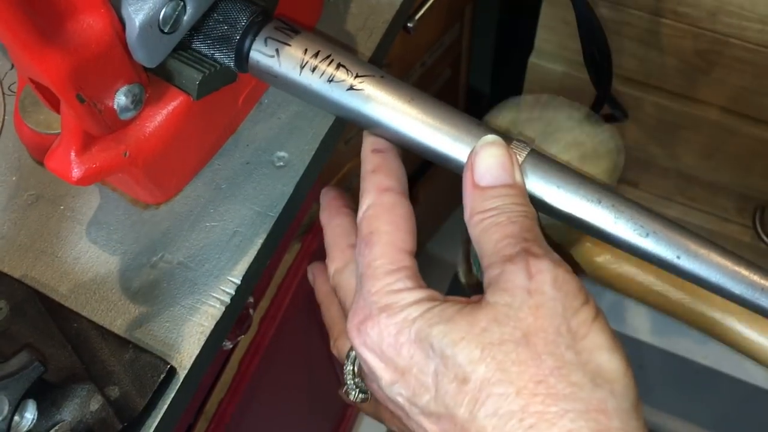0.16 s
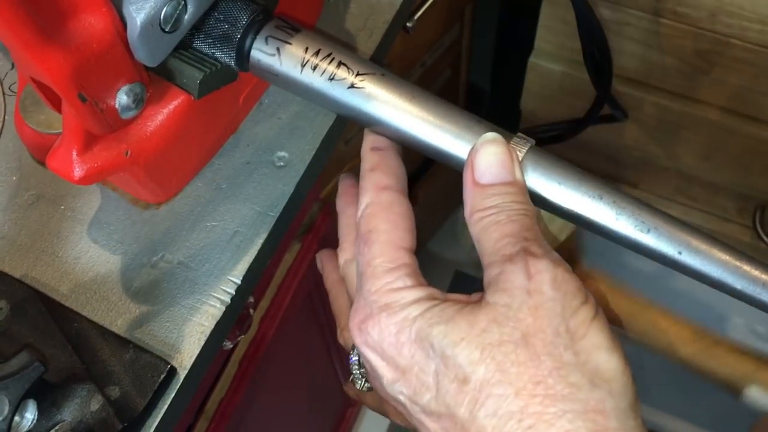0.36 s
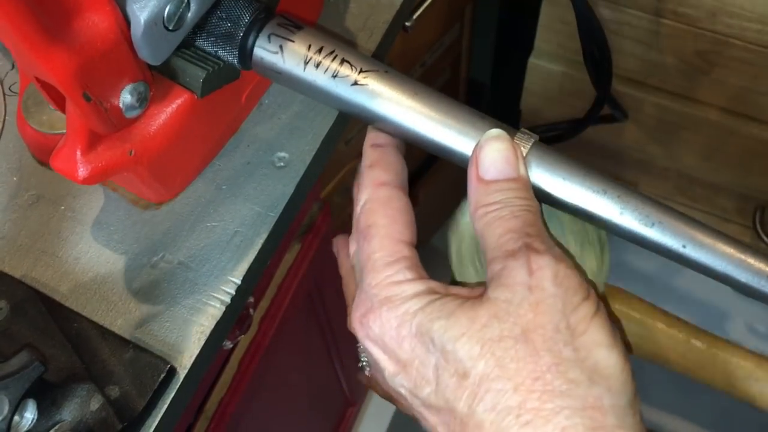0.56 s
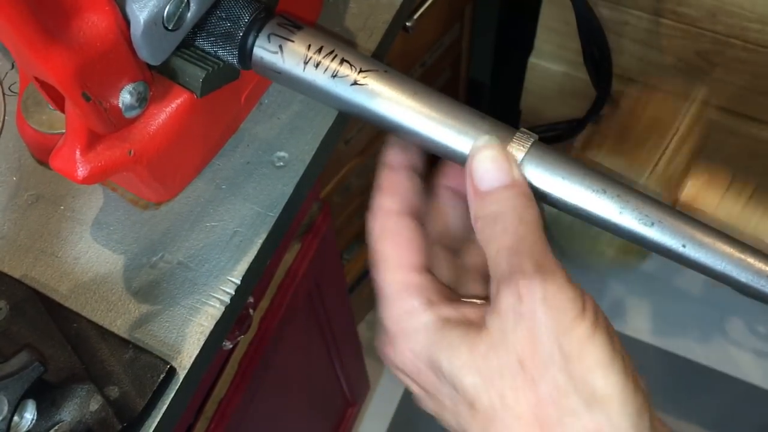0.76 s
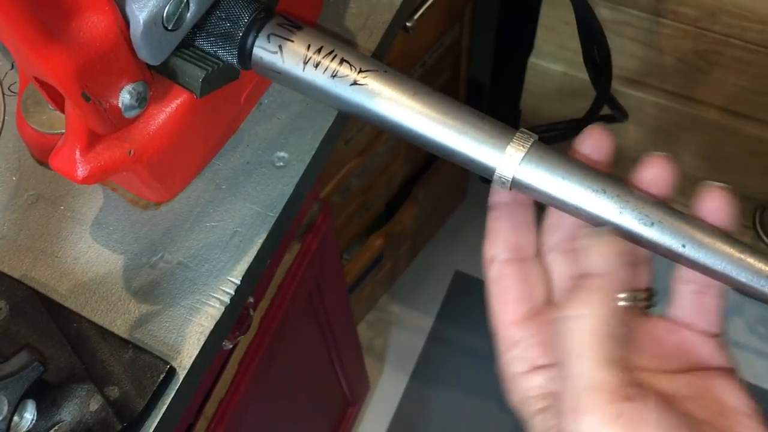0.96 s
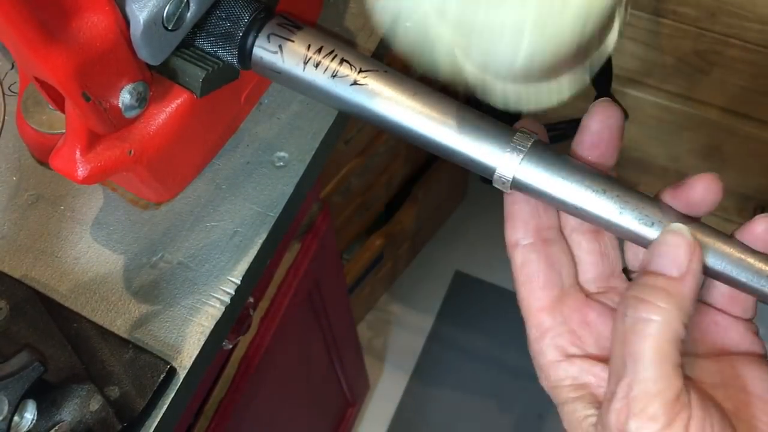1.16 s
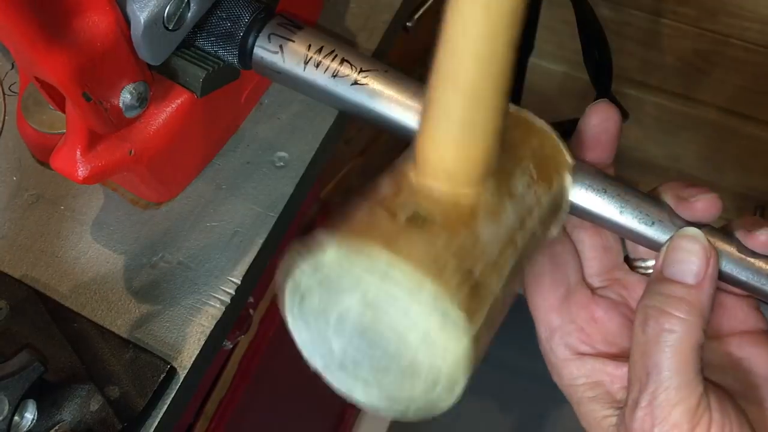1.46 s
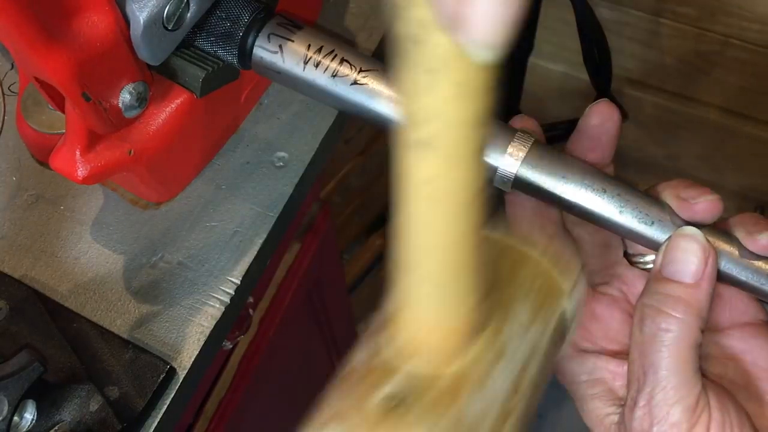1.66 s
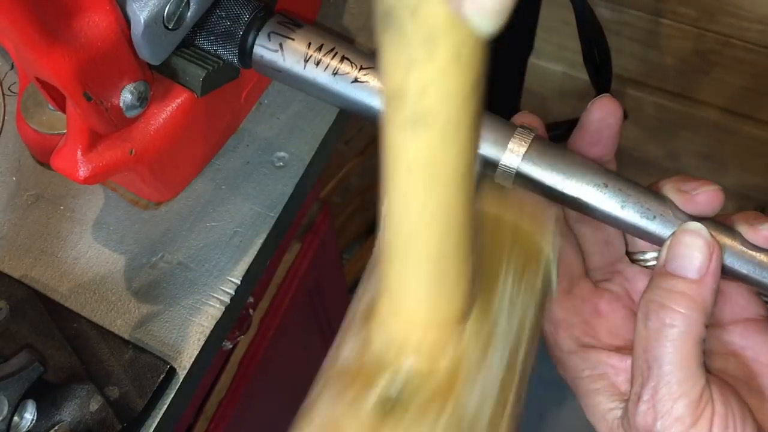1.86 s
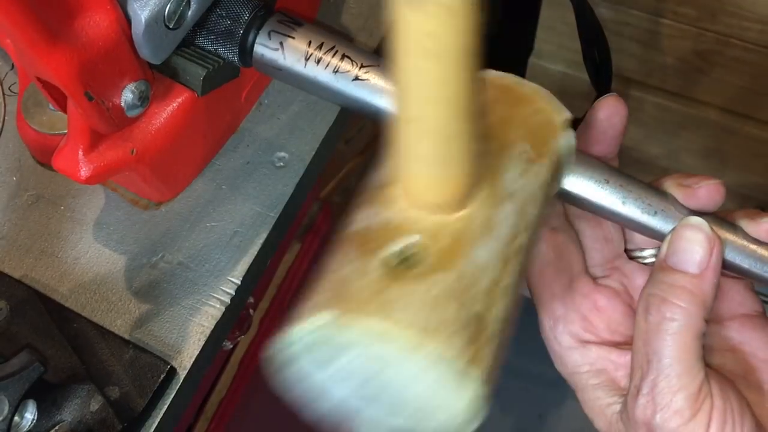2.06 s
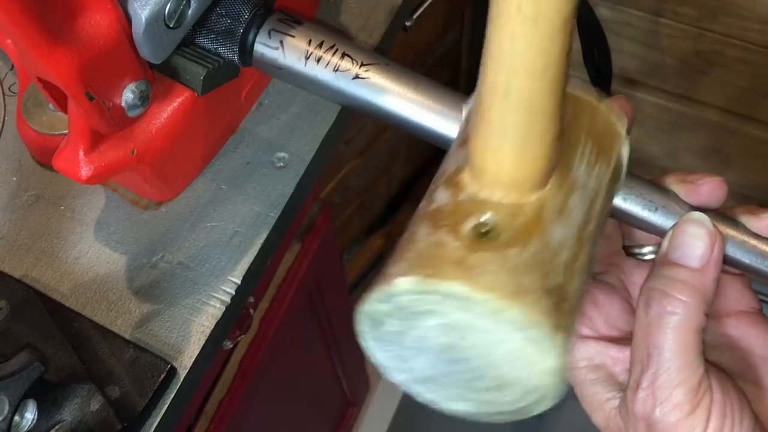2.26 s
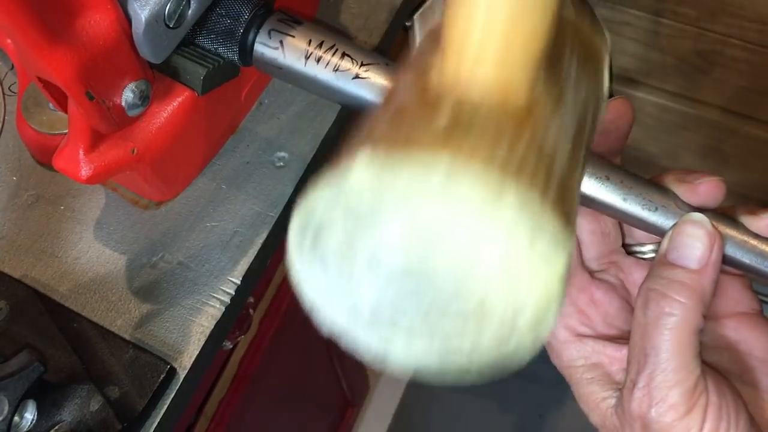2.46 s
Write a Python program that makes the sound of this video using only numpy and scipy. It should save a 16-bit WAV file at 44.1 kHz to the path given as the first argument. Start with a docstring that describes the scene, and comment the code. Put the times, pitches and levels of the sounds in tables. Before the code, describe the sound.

Rawhide mallet strikes a metal ring on a vice-held steel mandrel: three booming blows that rattle loose tools, a soft hand slide, then drier knocks in a small workshop, close microphone overloading on peaks.

```python
"""A small workshop: close by, a rawhide mallet knocks a metal ring on a steel mandrel held in a bench vice.
The first blows come from below and shake the bench, so loose tools rattle; the hand slides along the steel,
then the blows come from above. Noise bursts make the crack, knock, room tail, rattles and taps; fading tones
make the clack, bench, mallet, mandrel and ring. Uneven noise is the sliding hand; steady noise and faint tones
are the background. Loud peaks overload the microphone."""
import sys
import numpy as np
from scipy import signal
from scipy.fft import irfft
from scipy.io import wavfile
from scipy.ndimage import uniform_filter1d

SR = 44100
rng = np.random.default_rng(int(sys.argv[2]) if len(sys.argv) > 2 else 0)


def dump_mix(stems):
    """Bounce the given channels to the path in sys.argv[1] as a 16-bit WAV at rate SR."""
    frames = np.atleast_2d(stems).T  # one column per channel
    limited = np.clip(frames, -1, 1)  # hard clip at full scale
    pcm = np.round(limited * 32767).astype(np.int16)
    wavfile.write(sys.argv[1], SR, pcm)


N = 114660  # length of the scene [samples]
T = np.arange(round(.9 * SR)) / SR  # time within one short sound [s]
BANDS = np.geomspace(16, 18000, 42)  # centres of the noise bands [Hz]
RESONANCE_SPACING_HZ, RESONANCE_SPREAD_DB = 45, 4.5
FLUTTER, FLUTTER_HZ = .35, 55  # depth (1 = the tone's own strength) and random steps per second

# In all tables, t60 is the time a sound takes to fade by 60 dB; rise is the time constant of its start.
# "Octave level" is the loudness of the noise within one octave.


def amp(db):
    """Turns decibels into a gain."""
    return 10 ** (np.asarray(db) / 20)


def read(table, column=1):
    """Reads one column of a frequency table at each band centre."""
    table = np.array(table)
    return np.interp(np.log(BANDS), np.log(table[:, 0]), table[:, column])[:, None]


def add(mix, s, sound):
    """Mixes a sound in at time s [s]; a start before zero is cut off."""
    at = round(s * SR)
    sound = sound[max(-at, 0):]
    part = mix[max(at, 0):][:len(sound)]
    part += sound[:len(part)]


def band_noise(size, spread_db=0):
    """Random noise in narrow bands, with unit power per octave; spread_db makes chance resonances stand out."""
    hz = np.maximum(np.fft.rfftfreq(size, 1 / SR), 1)
    place = np.interp(np.log(hz), np.log(BANDS), np.arange(len(BANDS)))
    share = np.maximum(1 - abs(place - np.arange(len(BANDS))[:, None]), 0)  # neighbouring bands cross-fade
    random_phase = np.exp(2j * np.pi * rng.random(len(hz)))
    flat = random_phase * np.sqrt(size * SR / (2 * np.log(2) * hz))
    grid = np.arange(0, SR / 2, RESONANCE_SPACING_HZ)
    power = amp(spread_db * rng.standard_normal(len(grid))) ** 2
    relative_power = power / uniform_filter1d(power, size=15)  # keeps the broad colour even
    peaks = np.sqrt(np.interp(hz, grid, relative_power))
    return irfft(share * flat * peaks * (hz >= BANDS[0]), size)


def strike(rise_s, t60):
    """Loudness curve of a struck thing: quick rise and exponential decay."""
    rise = 1 - np.exp(-T / np.maximum(rise_s, 1e-5))
    return rise * np.exp(-np.log(1000) * T / t60)


def burst(db, rise_s, t60):
    """Countless overlapping resonances: uneven noise whose bands die at their own speed."""
    bands = band_noise(len(T), RESONANCE_SPREAD_DB)
    return (bands * amp(db) * strike(rise_s, t60)).sum(0)


def flutter():
    """Reflections make a ringing tone waver in level and phase after its start."""
    times = np.arange(0, 1, 1 / FLUTTER_HZ)
    a, b = rng.standard_normal((2, len(times))) * (times > 0)
    return np.interp(T, times, 1 + FLUTTER * (a + 1j * b) / np.sqrt(2))


def ringing(modes, rise_s):
    """A struck body rings at its own pitches (modes): one fading, wavering sine for each."""
    total = np.zeros(len(T))
    for hz, db, t60 in modes:
        tone = np.exp(2j * np.pi * (hz * T + rng.random()))
        total += amp(db) * strike(rise_s, t60) * (flutter() * tone).real
    return total


# The blows of the mallet, one row each; levels and colours adjust the tables of the parts below:
# (time [s], knock level [dB], bass colour [dB], presence colour [dB], treble colour [dB], bench level [dB],
#  mallet level [dB], mandrel level [dB], ring level [dB], ring's overtone level [dB],
#  clack pitch [Hz], clack level [dB])
BLOW_TIMES_AND_LEVELS = [(-.062, -4.5, 5, 2.5, 9, -0.5, -3.5, -7, 2, -5, 2750, -3),
                         (0.2408, -0.5, 5, -0.5, 7, 7.5, -10.5, 2.5, 2.5, -4.5, 5717, 1),
                         (0.541, 3, 6, 0.5, 8, 11, -13, 6.5, 11, 6.5, 1290, 0),
                         (1.5256, -5.5, -3.5, -1.5, -2, -5, -3.5, -13, -31.5, -25, 902, -3.5),
                         (1.7738, -3.5, 0.5, 3.5, 1, 1.5, -8, -7.5, -1, -27, 2255, 0),
                         (2.0363, -1.5, -4, 0.5, -1, -1.5, 2, -2, -7.5, -13.5, 2173, -1.5),
                         (2.2022, -13.5, 6, -2.5, -2, -26.5, -16.5, -37, -33.5, -28, 1240, -15),
                         (2.2744, 2, -5.5, -0.5, 5, 1, 0, -1.5, 10, 11.5, 2110, 0)]
BASS_HZ, PRESENCE_HZ, TREBLE_HZ = 690, 2400, 3800  # bass edge, middle of presence, treble edge
PRESENCE_OCTAVES = 0.46  # width of the presence bump


def blow(knock_db, bass_db, presence_db, treble_db, bench_db, mallet_db, mandrel_db, ring_db, overtone_db,
         clack_hz, clack_db):
    """One blow: crack, knock and room tail, the clack of contact, and everything that it sets ringing."""
    hz = BANDS[:, None]
    low = 1 / (1 + (hz / BASS_HZ) ** 3)
    middle = np.exp(-.5 * (np.log2(hz / PRESENCE_HZ) / PRESENCE_OCTAVES) ** 2)
    high = 1 / (1 + (TREBLE_HZ / hz) ** 4)
    colour_db = knock_db + bass_db * low + presence_db * middle + treble_db * high
    contact = crack(knock_db) + knock(colour_db) + clack(clack_hz, clack_db)
    bodies = mallet(mallet_db) + mandrel(mandrel_db) + metal_ring(ring_db, overtone_db) + bench(bench_db)
    return contact + bodies + room_tail(colour_db)


# Crack of first contact: (frequency [Hz], octave level [dB])
CRACK_COLOUR = [(150, -40.5), (1000, -12), (2500, -15), (5500, -10), (9000, -27.5), (15000, -17.5)]


def crack(knock_db):
    """The first contact: a very short burst of noise."""
    return burst(read(CRACK_COLOUR) + knock_db, rise_s=.0004, t60=.015)


# Dense knock: (frequency [Hz], octave level [dB], t60 [s], rise [s])
KNOCK_COLOUR = [(58.5, -36.5, 0.083, 0.0084), (176, -18, 0.1, 0.024), (400, -11, 0.1, 0.0046),
                (755, -23, 0.26, 0.003), (1197, -12.5, .1, 0.0012), (2480, -8.5, 0.064, 0.00084),
                (4394, -18.5, 0.094, .0002), (8000, -27.5, .06, .0002), (15000, -27.5, 0.1, .0002)]


def knock(colour_db):
    """The body of the blow: dense noise in which each band rises and fades at its own speed."""
    rise_s = read(KNOCK_COLOUR, column=3)
    return burst(read(KNOCK_COLOUR) + colour_db, rise_s, read(KNOCK_COLOUR, column=2))


# Nearby surfaces throw the clack back: (delay [s], level [dB])
CLACK_ECHOES = [(.006, -17), (.0155, -13.5), (.027, -21.5)]


def echoes(sound):
    """The sound followed by its early reflections, each a delayed, weaker copy."""
    out = sound.copy()
    for delay_s, db in CLACK_ECHOES:
        add(out, delay_s, amp(db) * sound)
    return out


CLACK_T60_S, CLACK_RISE_S = 0.02, 0.0004
CLACK_TAIL_DB, CLACK_TAIL_T60_S, CLACK_DAMPING_HZ = -17, .23, 5000  # t60 for very low clacks
STEEL_RISE_S = .004


def clack(hz, db):
    """The contact rings briefly at one pitch with echoes, over a longer, weaker tail at that pitch."""
    short = echoes(ringing([(hz, db, CLACK_T60_S)], CLACK_RISE_S))
    tail_t60 = CLACK_TAIL_T60_S / (1 + (hz / CLACK_DAMPING_HZ) ** 2)  # higher clacks die sooner
    return short + ringing([(hz, db + CLACK_TAIL_DB, tail_t60)], STEEL_RISE_S)


# Modes of the rawhide mallet: (frequency [Hz], level [dB], t60 [s])
MALLET_MODES = [(904, -19, .23), (960, -21, .14), (1012, -26, .17), (1140, -28, .16), (1316, -27, .19),
                (1410, -24, .13), (1464, -27, .19), (1700, -23, .13), (1820, -25, .12), (2128, -25, .18),
                (2296, -26, .17), (2402, -23, .13), (2770, -23, .13), (2895, -28, .17)]


def mallet(db):
    """The mallet's closely packed modes ring together."""
    return amp(db) * ringing(MALLET_MODES, rise_s=.0015)


# Modes of the steel mandrel: (frequency [Hz], level [dB], t60 before the hand's choking [s])
MANDREL_MODES = [(3788, -26, .11), (4378, -43, .2), (4472, -31, .38), (5292, -38, .13), (5930, -45, .18),
                 (6760, -46, .17), (8113, -32, .16)]
GRIP_S = .17  # time after the start of a blow when the choking sets in


def mandrel(db):
    """The steel rings at its modes until the hand chokes it."""
    choke = 1 / np.sqrt(1 + (T / GRIP_S) ** 10)
    return amp(db) * ringing(MANDREL_MODES, STEEL_RISE_S) * choke


# Modes of the metal ring: (frequency [Hz], level [dB], t60 [s])
RING_MODES = [(8032, -37, .14), (10150, -42, .14), (10960, -37, .13), (11166, -21, .15), (14250, -38, .14),
              (15100, -43, .12)]
# The ring's separately set overtone: (frequency [Hz], level [dB], t60 [s])
OVERTONE_MODE = [(12290, -46, .33)]
RING_RISE_S = 0.029


def metal_ring(db, overtone_db):
    """The ring's high modes swell and fade, with one longer overtone."""
    overtone = amp(overtone_db) * ringing(OVERTONE_MODE, RING_RISE_S)
    return amp(db) * ringing(RING_MODES, RING_RISE_S) + overtone


# Modes of the bench: (frequency [Hz], level [dB], t60 [s])
BENCH_MODES = [(106.6, -36, 0.17), (164.2, -25.5, 0.18), (252, -53.5, .3), (346.2, -23.5, 0.18),
               (387.5, -31, .3), (480.2, -31, 0.17), (549, -36.5, 0.12), (686, -35, 0.14)]
# Slow sway of the bench: (frequency [Hz], level [dB], t60 [s])
BENCH_SWAY = [(43.5, -30, 0.5)]


def bench(db):
    """The bench booms at its low modes and sways more slowly underneath."""
    return amp(db) * (ringing(BENCH_MODES, rise_s=0.0034) + ringing(BENCH_SWAY, rise_s=0.068))


# Room tail: (frequency [Hz], octave level [dB], t60 [s])
ROOM_COLOUR = [(60.6, -37, 0.56), (169.5, -26, .45), (383, -28, .36), (700, -34.5, 0.47), (1220, -18, 0.22),
               (2480, -20, 0.24), (4280, -26.5, 0.23), (8020, -30, 0.16), (14900, -38, 0.13)]


def room_tail(colour_db):
    """The room answers with softer noise that builds up slowly and lasts longer."""
    return burst(read(ROOM_COLOUR) + colour_db, rise_s=0.024, t60=read(ROOM_COLOUR, column=2))


# Hops of the loose tools: (time [s], level [dB])
RATTLE_HOPS = [(.070, -39.5), (.347, -29.5), (0.363, -27), (0.389, -31.5), (0.7061, -33), (0.7358, -39)]
# Colour of a hop, added to its level: (frequency [Hz], octave level [dB])
HOP_COLOUR = [(300, -16), (1500, -4.5), (2300, -0.5), (2850, 10), (3800, -8.5), (6000, -16), (15000, -29)]


def rattle(db):
    """A loose tool hops once on the bench: a short noise burst."""
    return burst(db + read(HOP_COLOUR), rise_s=.003, t60=.06)


# Loudness of the rubbing hand, added to its colour; silent outside these times: (time [s], level [dB])
RUBBING_LEVEL = [(.60, -14), (.74, 3), (.83, 1), (.92, 0), (1.03, -7.5), (1.2, -12), (1.359, -13.5),
                 (1.52, -20)]
# Colour of skin on steel: (frequency [Hz], octave level [dB])
SLIDE_COLOUR = [(300, -60.5), (1000, -61.5), (3500, -72), (6000, -61.5), (9000, -70), (13000, -62),
                (16000, -69.5)]
SKIN_GRAIN_DB, SKIN_GRAIN_HZ = 1.5, 45.2  # skin catches and lets go: typical change, steps per second


def slide():
    """Skin hisses unevenly on polished steel: noise that swells and fades with a random grain."""
    t = np.arange(N) / SR
    grain = np.interp(t * SKIN_GRAIN_HZ, np.arange(400), rng.standard_normal(size=400))
    rubbing_db = np.interp(t, *np.transpose(RUBBING_LEVEL), left=-np.inf, right=-np.inf)
    hiss = (band_noise(N) * amp(read(SLIDE_COLOUR))).sum(0)
    return amp(rubbing_db + SKIN_GRAIN_DB * grain) * hiss


# Light taps on ring and steel: (time [s], octave level at 2000 Hz [dB], tilt above 1000 Hz [dB per octave])
LIGHT_TAPS = [(.105, -58, 0), (.116, -53.5, -5), (.454, -49.5, -4.5), (.800, -48.5, -8),
              (.975, -54.5, -3.5), (1.100, -71.5, 0.5), (1.162, -67, 1), (1.379, -57, -9),
              (2.215, -55.5, 8)]


def tap(db, tilt_db):
    """A light touch: a short noise burst, dull or bright by its tilt, weaker in the bass."""
    octaves = np.log2(BANDS[:, None] / 2000)
    tilt = tilt_db * np.maximum(octaves, -1)
    bass_loss = 4 * np.minimum(octaves + 1, 0)  # 4 dB less for each octave below 1000 Hz
    return burst(db + tilt + bass_loss, rise_s=0.00085, t60=0.065)


# Background rumble and hiss: (frequency [Hz], octave level [dB])
BACKGROUND_COLOUR = [(15, -45.5), (32, -42.5), (55, -53), (90, -61.5), (150, -63), (220, -59), (330, -63.5),
                     (800, -64), (1600, -65), (2100, -75), (2700, -66.5), (4000, -76), (7000, -72),
                     (9500, -82.5), (13000, -74)]
# Faint background hum: (frequency [Hz], level [dB])
HUM_TONES = [(230, -59), (480, -63), (752, -68), (1610, -71.5)]


def workshop():
    """Steady noise makes the rumble with a little hiss; steady sines make the hum."""
    t = np.arange(N) / SR
    hum = sum(amp(db) * np.sin(2 * np.pi * (hz * t + rng.random())) for hz, db in HUM_TONES)
    return hum + (band_noise(N) * amp(read(BACKGROUND_COLOUR))).sum(0)


def scene():
    """Blows, rattles, taps and the sliding hand over the workshop's background."""
    mix = workshop() + slide()
    for source, table in ((blow, BLOW_TIMES_AND_LEVELS), (rattle, RATTLE_HOPS), (tap, LIGHT_TAPS)):
        for s, *row in table:
            add(mix, s, source(*row))
    return mix[None]


CUTOFF_HZ = 15650


def record(dry):
    """The microphone overloads on the peaks, the recorder rounds off what is left; both are band-limited."""
    ceiling = .55  # 1 = full scale
    band_limit = signal.firwin(301, CUTOFF_HZ, window=("kaiser", 9), fs=SR)[None]
    clipped = signal.oaconvolve(np.clip(dry, -ceiling, ceiling), band_limit, "same")
    rounded = clipped / (1 + (clipped / ceiling) ** 12) ** (1 / 12)
    return signal.oaconvolve(rounded, band_limit, "same")


dry = scene()
out = record(dry)
dump_mix(out)
```